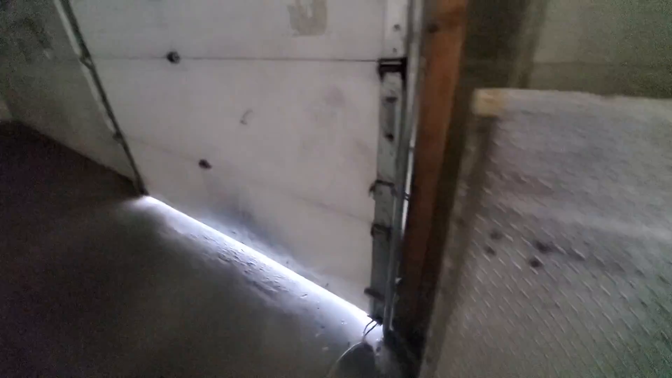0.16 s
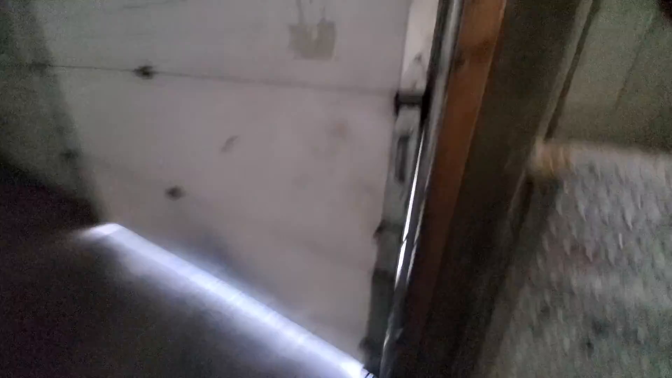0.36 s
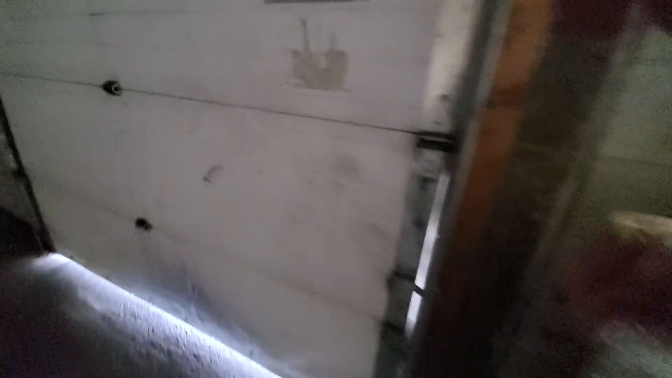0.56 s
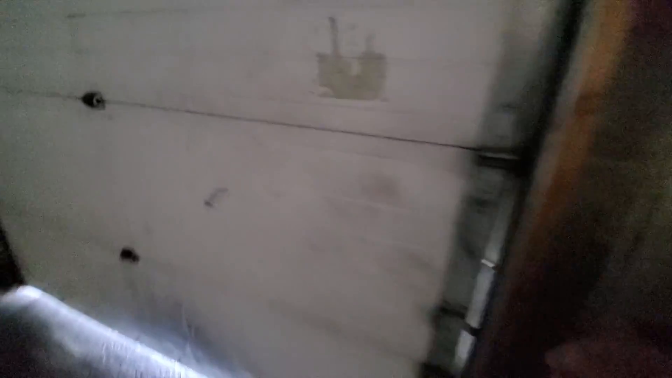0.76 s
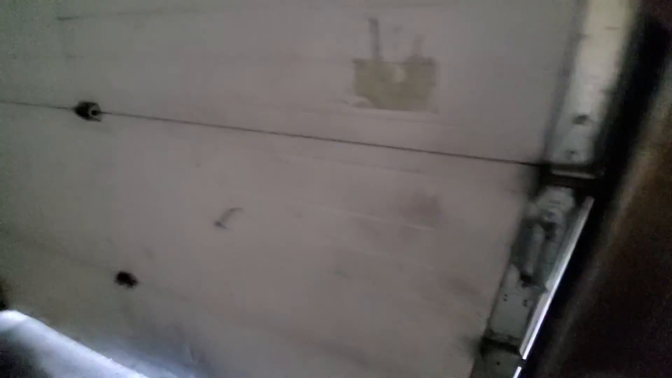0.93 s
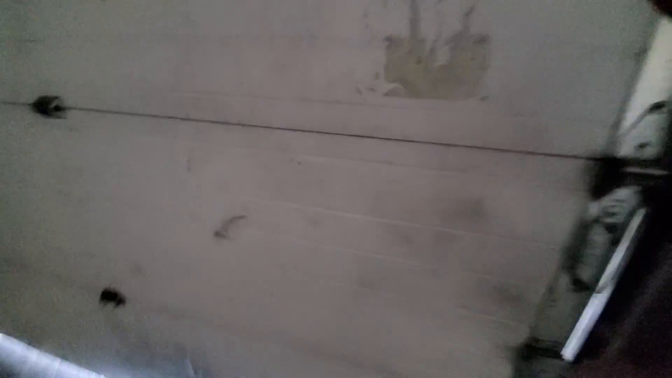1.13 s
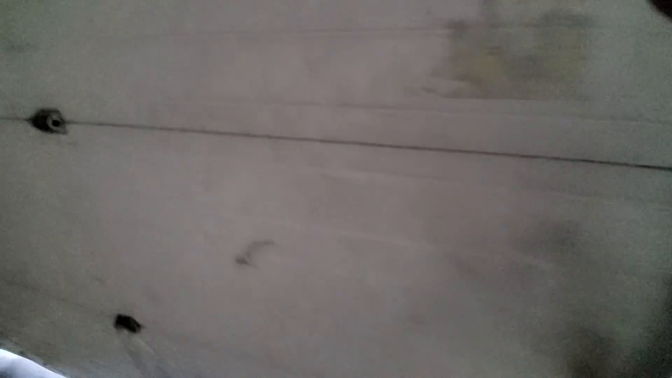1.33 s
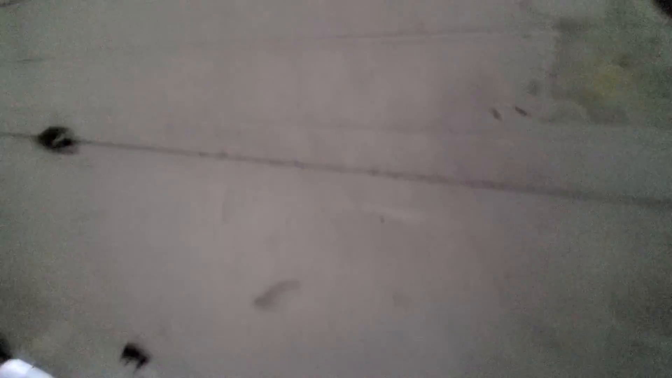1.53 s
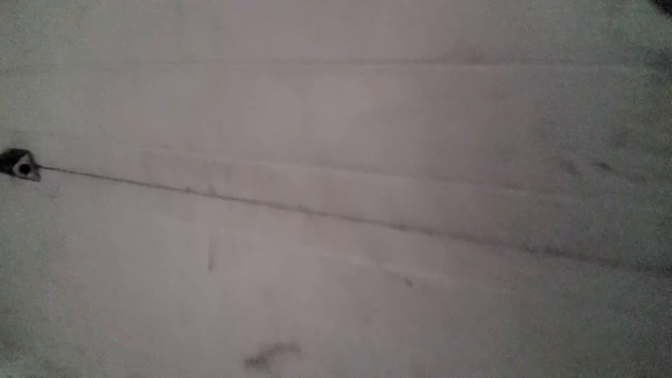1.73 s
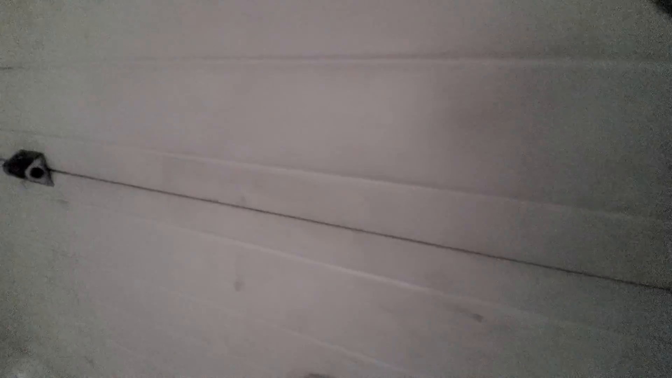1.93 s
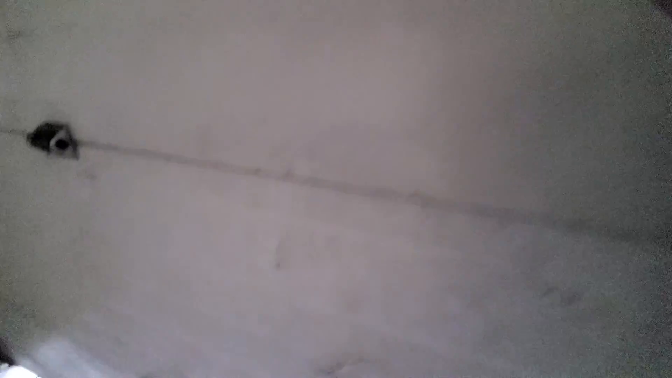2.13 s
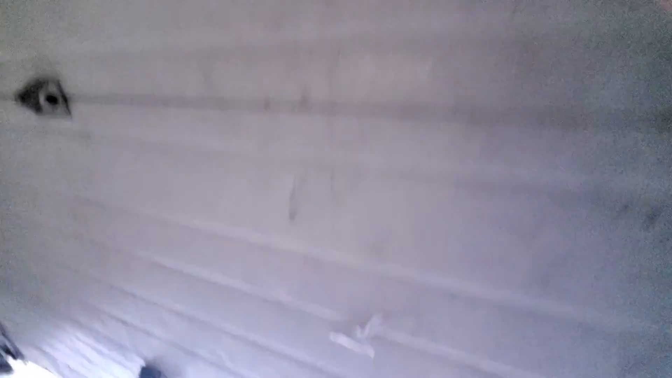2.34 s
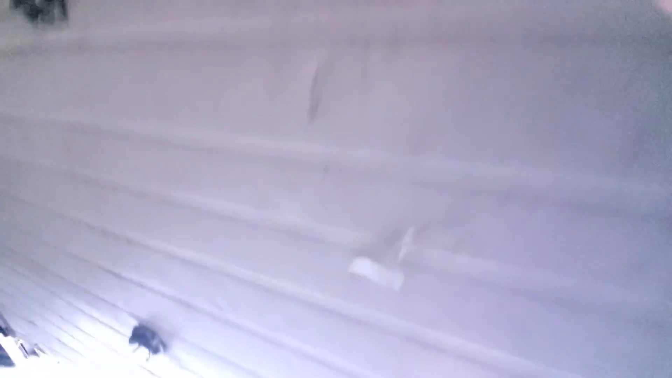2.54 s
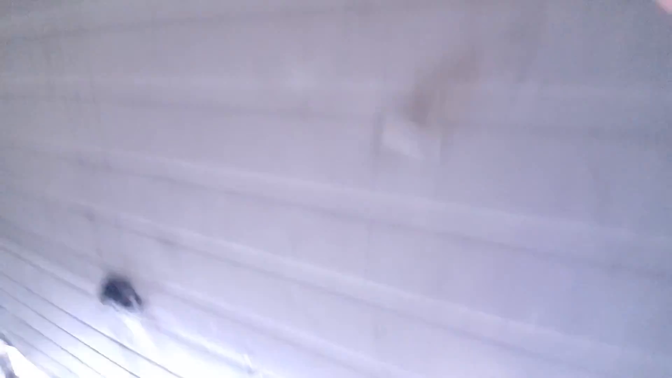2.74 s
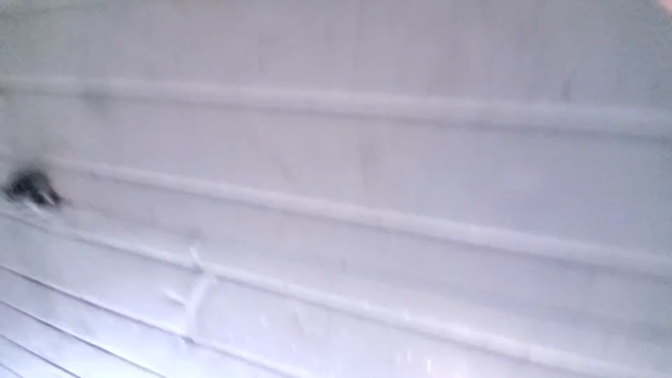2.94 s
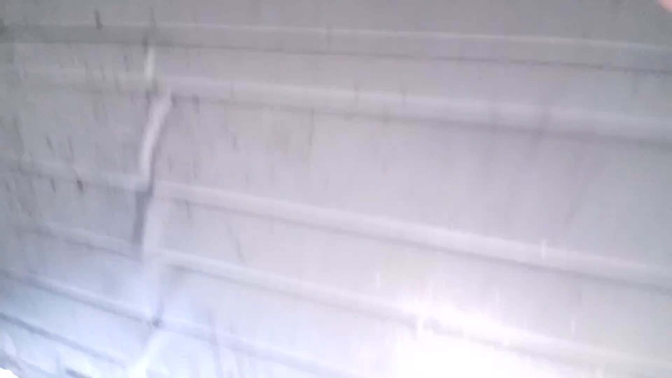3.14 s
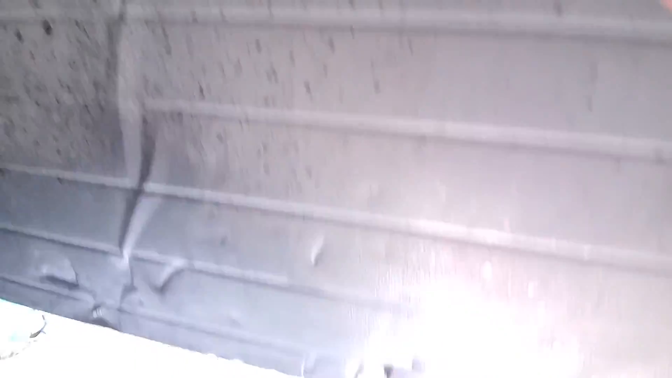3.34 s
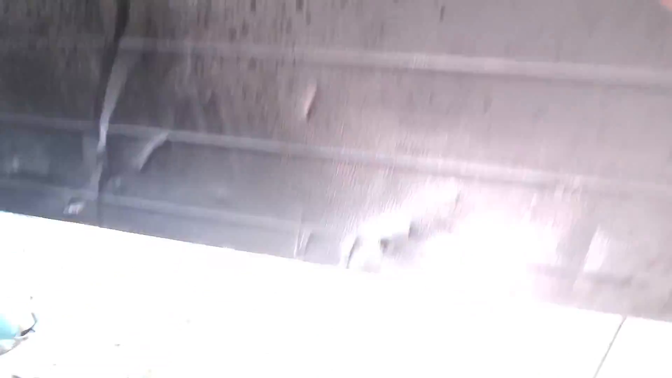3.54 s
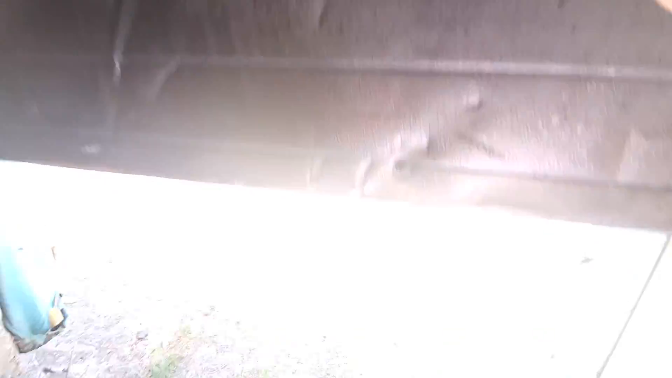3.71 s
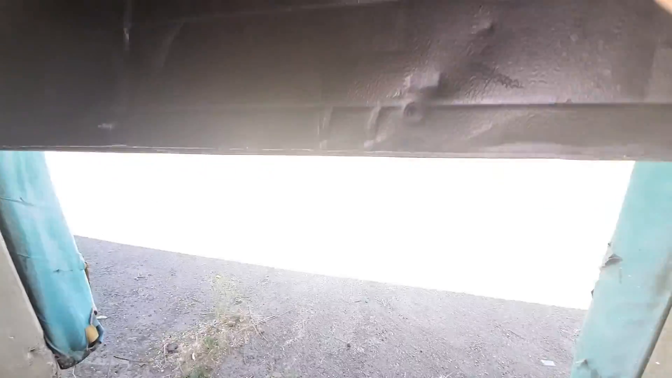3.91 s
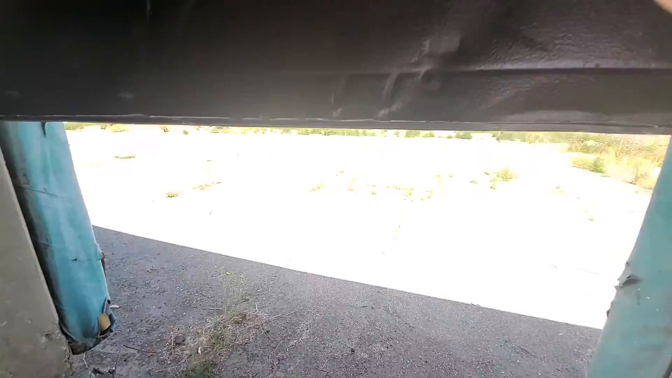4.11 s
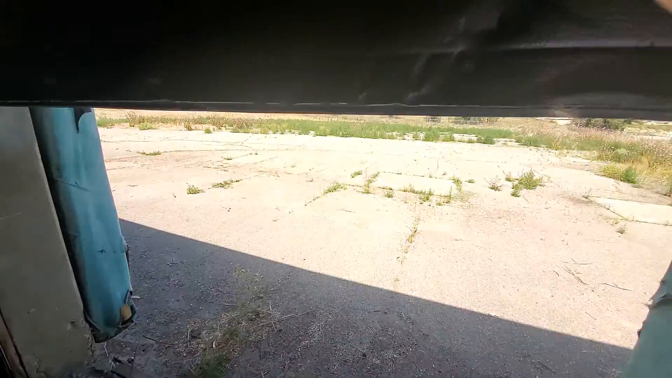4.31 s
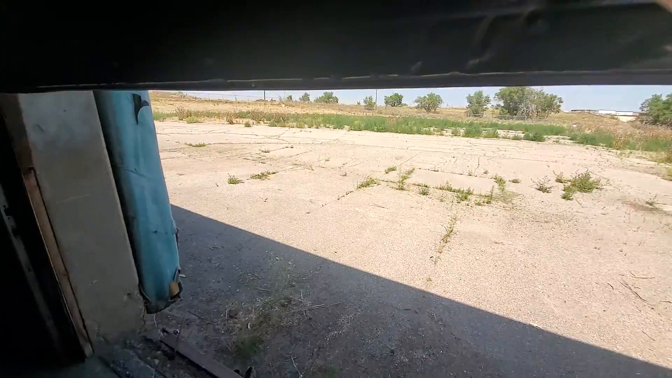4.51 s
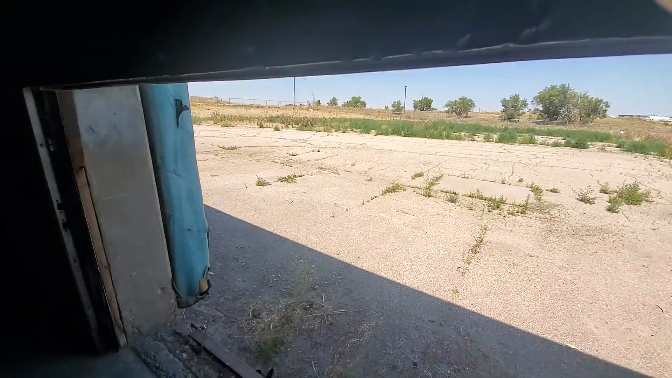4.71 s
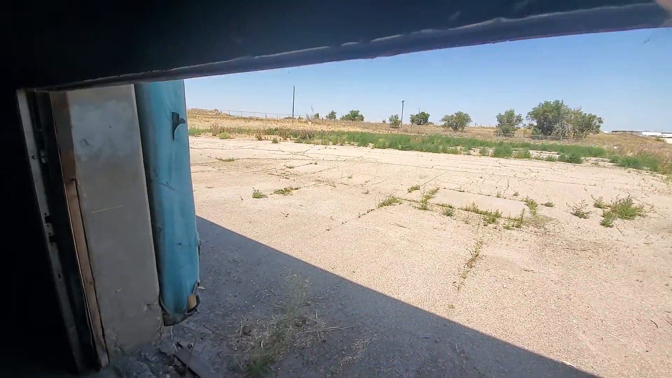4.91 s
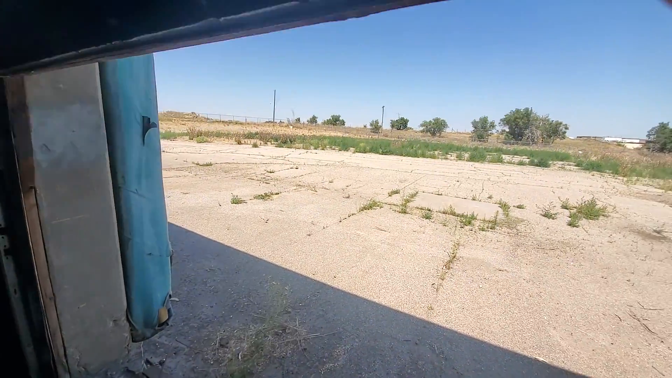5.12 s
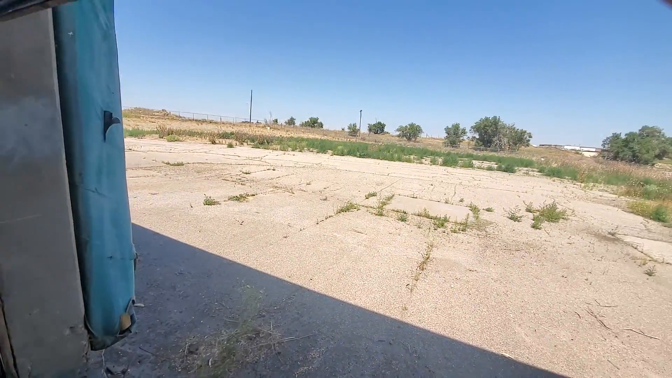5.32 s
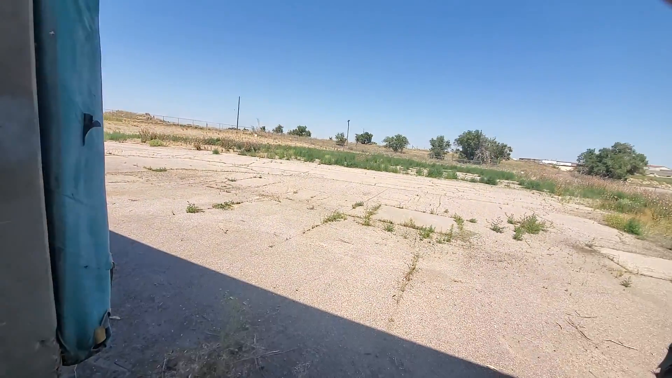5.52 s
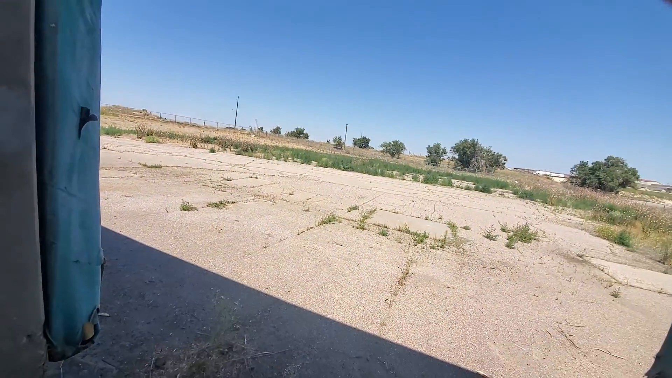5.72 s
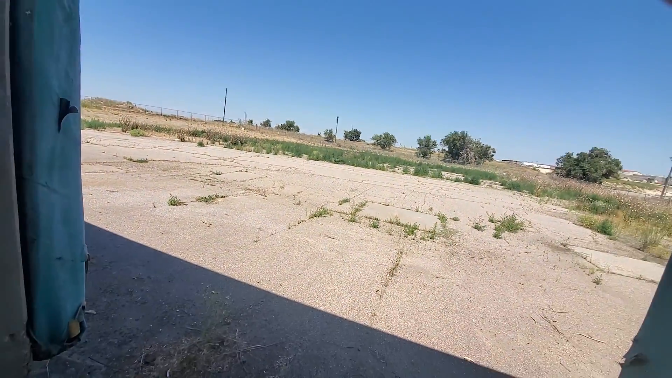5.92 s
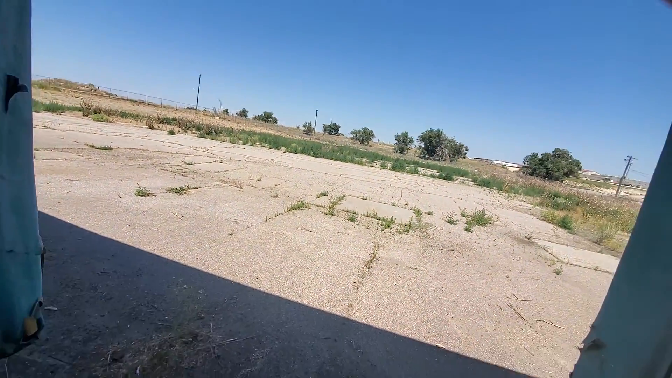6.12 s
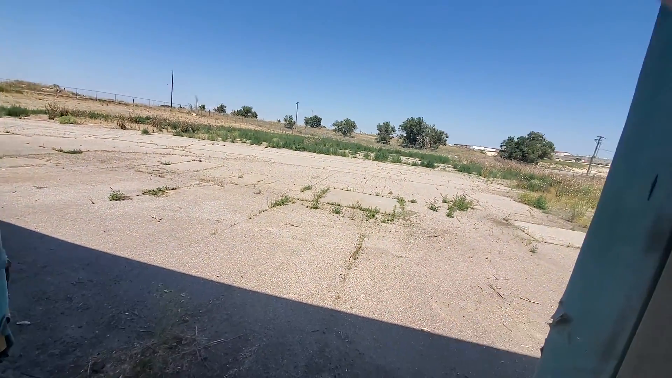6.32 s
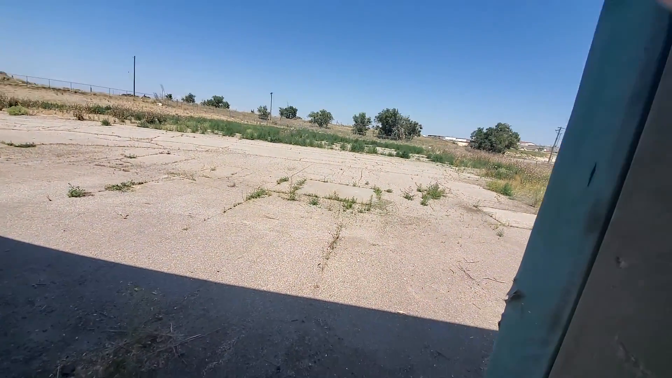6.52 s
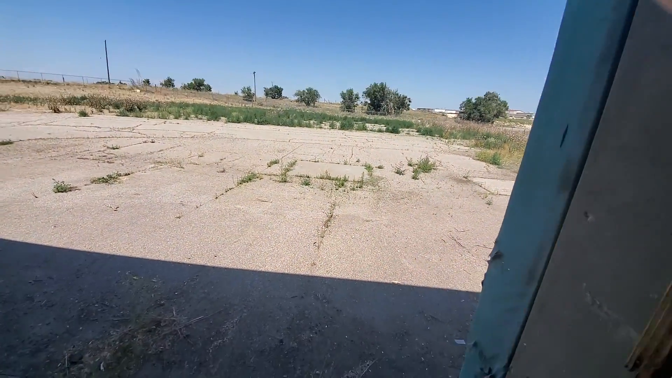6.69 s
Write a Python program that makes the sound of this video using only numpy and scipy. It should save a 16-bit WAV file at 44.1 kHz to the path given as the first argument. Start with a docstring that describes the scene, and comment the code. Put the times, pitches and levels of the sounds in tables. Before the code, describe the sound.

Hand taps and a sharp steel bolt slam precede a big overhead door clattering, squealing and drumming open by hand, ringing through a hollow hall.

```python
"""A sectional steel door is pushed up by hand in two shoves: rollers rattle and grind, panels rumble and drum.
Before that a hand taps and rubs the latch, and the bolt scrapes back and slams against its stop.
Hinges clack, squeal and slap, a dry axle chirps, and a large warehouse rings on over a faint mains hum.
Rolling and scraping are shaped noise and dense random ticks; blows are fading noise and ringing tones."""
import sys
import numpy as np
from scipy import signal
from scipy.fft import rfft, irfft, next_fast_len
from scipy.io import wavfile
from scipy.ndimage import uniform_filter1d, map_coordinates

SR = 44100
rng = np.random.default_rng(int(sys.argv[2]) if len(sys.argv) > 2 else 0)


def materialize(psi):
    """Save the field psi as 16-bit PCM at rate SR to the path in sys.argv[1].

    A 1-D psi becomes a single channel; in a 2-D psi each row is a channel.
    """
    bounded = np.clip(np.atleast_2d(psi).T, -1, 1)
    quanta = np.round(bounded * 32767).astype(np.int16)
    wavfile.write(sys.argv[1], SR, quanta)


N = 297874  # length in samples

# The two shoves that lift the door.
# Each row: start in seconds, speeding-up time in seconds, steady time in seconds, relative level in dB.
SHOVES = [(2.122, 0.77, 0.58, 1), (4.619, 0.57, 0.5, -2)]
START_DB, EASE = -25, 2.43  # a shove begins this far below its top; exponent of the climb
CREEP_DB = -14.5  # between the shoves the door never quite stops; this is the rumble's share
STOP_S = 6.34  # the rollers come to rest: grinding fades and random grit ticks end

# Layers that follow the shoves: base level in dB, and dB lost per second of coasting.
RATTLE_DB, RATTLE_COAST_DB_PER_S = -29, 21
GRIT_DB, GRIT_COAST_DB_PER_S = -42, 28
RUMBLE_DB, RUMBLE_COAST_DB_PER_S = -24, 16.5
DRUM_DB, DRUM_COAST_DB_PER_S = -34, 7
BOOM_DB, BOOM_COAST_DB_PER_S = -33, 14.5
RECEDE_DB_PER_S = 0.83  # the rattle weakens as the rollers move away overhead

# Pitch of the rattling parts along the travel. Each row: time in seconds, centre in Hz.
RATTLE_PITCH = [(2.2, 2080), (2.6, 2400), (3.2, 2222), (3.7, 2052), (5.0, 2048), (5.8, 1760)]
# Resonances of the tracks. Each row: frequency in Hz, width in Hz, lift in dB.
TRACK_RESONANCES = [(2230, 17, -8), (2930, 90, 7.5), (3345, 63, 6), (3650, 40, 8.5), (5730, 35, 12),
                    (7900, 110, -2.5)]
# Colour of the rattle. Each row: frequency in Hz, relative level in dB per Hz.
RATTLE_COLOUR = [(400, -4.5), (900, -4), (1300, -18), (1700, 1.5), (2100, -2), (2800, -6.5), (3300, -9.5),
                 (4500, -18), (5500, -27), (8000, -59)]
# Colour of the grinding grit. Each row: frequency in Hz, relative level in dB per Hz.
GRIT_COLOUR = [(2500, -44.5), (4200, 5), (5200, 1), (6500, 1), (7500, -4), (8300, -13), (9400, -16.5),
               (11300, -7), (13500, -10.5), (16000, -11.5)]
# Sharp grit ticks at set times. Each row: time in seconds, level in dB.
SET_GRIT_TICKS = [(2.35, -41), (4.192, -46), (4.213, -39.5), (4.33, -52), (4.574, -43.5), (4.936, -37.5),
                  (5.294, -34), (5.497, -34), (5.903, -38)]
# Other grit ticks come at random, some louder, and follow the motion:
# ticks per second, base level in dB, most extra in dB, 60 dB fade of every grit tick in seconds.
CRACKS_PER_S, CRACK_DB, CRACK_SPREAD_DB, CRACK_T60 = 5.7, -48, 27.5, 0.042

# Resonances of the rolling panels. Each row: frequency in Hz, width in Hz, lift in dB.
PANEL_RESONANCES = [(70.2, 4.1, 11.5), (297, 17.3, 12), (425, 20, 4), (584, 5.1, 4.5)]
# Colour of the deep boom. Each row: frequency in Hz, relative level in dB per Hz.
BOOM_COLOUR = [(12, -48), (29, 10), (40, 4.5), (75, 9.5), (125, 5), (165, -4.5), (260, -56)]
# Colour of the rumble. Each row: frequency in Hz, relative level in dB per Hz.
RUMBLE_COLOUR = [(70, -45), (120, 2.5), (190, 2), (350, -8), (580, -9), (800, -14.5), (1100, -11),
                 (1600, -12.5), (3000, -80.5)]
# The whole door flexes and booms. Each row: middle in seconds, length in seconds, relative level in dB.
FLEXES = [(2.31, 0.73, -27), (2.73, 0.37, -21.5), (2.94, 0.4, -22), (3.32, 0.166, -23.5), (6.16, 0.2, -32)]
# A panel drums as it bends over the track's curve.
# Each row: middle in seconds, length in seconds, relative level in dB.
BENDS = [(2.95, 0.22, -28), (3.29, 0.33, -29), (3.65, 0.14, -21), (3.88, 0.11, -19), (4.11, 0.43, -25.5),
         (5.31, 0.27, -21.5), (5.63, 0.16, -26.5)]
# The drumming pitch shifts with the bending. Each row: time in seconds, approximate pitch in Hz.
DRUM_PITCH = [(2.96, 173), (3.45, 166), (3.68, 151.7), (5.0, 156), (5.5, 168.6), (6.4, 154.2)]
DRUM_RING_S = 0.0076  # the drumming from a bend swells and dies with this lag
OVERTONE, OVERTONE_DB = 1.91, -21  # a higher panel mode: pitch ratio and relative level in dB
UPRIGHT_DB, UPRIGHT_S = 14.5, 0.9  # extra boom while the door stands upright; how fast it wears off
UNLATCHED_S, STIR_DB = 1.314, -44.5  # the freed door stirs in its tracks from here
LIFT_OFF_S, SEATED_DB = 2.26, -16  # until its bottom edge leaves the floor, the boom is damped

# Light taps of the hand and the loose bolt.
# Each row: time in seconds, relative level in dB, treble setting in dB, approximate ring in Hz.
TAPS = [(0.0315, -35.5, -20, 2600), (0.0945, -36, 1, 635), (0.162, -27, -0.5, 1190),
        (0.1964, -18, -9.5, 1480), (0.2013, -30, -18, 566), (0.2177, -25, -9, 1310), (0.7093, -39, -2, 624),
        (0.7135, -27.5, -11.5, 1270), (0.7847, -29.5, -36, 670), (0.804, -37, -21, 734),
        (0.821, -23.5, -26, 1690), (1.303, -28, -37, 850), (1.3124, -38, 3, 1710), (1.346, -10, -18, 1990),
        (1.353, -15.5, -30, 1840)]
TAP_KNOCK_DB, TAP_KNOCK_DB_PER_OCTAVE = 3, -13  # knock of a tap that rings at 1 kHz; higher ones knock less
TAP_T60 = 0.024  # seconds for a tap that rings at 1 kHz; low ones are damped by the hand
# A hand rubs over the latch. Each row: start in seconds, length in seconds, level in dB.
RUBS = [(0.104, 0.09, -51), (0.47, 0.038, -73), (0.724, 0.0097, -50.5), (0.861, .02, -53.5),
        (1.307, 0.045, -50), (1.38, 0.096, -47.5)]
RUB_RISE_DB_PER_S, RUB_FALL_DB_PER_S = 899, 89

# The bolt scrapes through its guide. Each row: time in seconds, level in dB.
SLIDE = [(1.424, -59), (1.435, -26.5), (1.441, -25), (1.452, -22), (1.468, -23), (1.48, -27.5),
         (1.53, -89.5)]
# The bolt hammers into its stop. Each row: time in seconds, steel level in dB, thud level in dB.
SLAMS = [(1.4709, -12.5, -24), (1.474, -6.5, -28.5), (1.48, -17, -15)]
SLAM_T60, THUD_T60 = 0.039, 0.073  # seconds to fade by 60 dB
# The struck steel sings on faintly. Each row: pitch in Hz, centre level in dB, 60 dB fade in seconds.
SINGING = [(1850, -70.5, 1.2), (2815, -52, 1.6), (6121, -60.5, 1.14)]
# Colour of the bolt's thud. Each row: frequency in Hz, relative level in dB per Hz.
THUD_COLOUR = [(110, -38), (210, 6), (480, -5), (750, -9), (1300, -5.5), (3000, -21)]
# Stereo balance of the bolt. Each row: frequency in Hz, left minus right in dB.
BOLT_BALANCE = [(1200, 5), (3000, 6.5), (12000, -3.5)]

# Steel on steel, at bolt, hinges and track joints. Each row: time in seconds, relative level in dB,
# relative knock in dB, treble setting in dB, 60 dB fade in seconds.
CLACKS = [(1.4369, -4, -16, -5, 0.079), (1.8506, -11.5, -10, -18, 0.06), (1.8598, -13.5, -10, -7.5, 0.041),
          (1.873, -21, -17, -19, 0.075), (2.6799, -11.5, -45, -22.5, 0.5), (2.952, -11, -3, -29, 0.49),
          (3.0347, -8, -6, -52, 0.28), (3.271, -0.5, -17, -15, 0.1), (3.29, -2.5, -15, -20, 0.11),
          (3.3131, -4, -11, -15, 0.13), (3.3956, -14.5, 2, -3, 0.11), (3.411, -15, -19, -0.5, 0.034),
          (3.4391, -20.5, 10, -41, 0.32), (3.5917, -17, 10.5, -20, 0.19), (3.6306, -30, 18.5, -30, 0.19),
          (4.5886, -28.5, 7.5, -11, 0.14), (5.046, -10.5, -5, -24.5, 0.11),
          (5.1231, -11.5, -11, -24, 0.056), (5.4891, -15, -4, -19, 0.28), (5.719, -13.5, -1, -47, 0.051),
          (5.903, -17, -7, -19, 0.19), (6.127, -5, -20, -24.5, 0.028), (6.134, -14.5, -18, -22.5, 0.21),
          (6.4448, -35, -4, -11.5, 0.11)]
# Modes of the bolt and brackets. Each row: frequency in Hz, relative strength in dB.
STEEL_MODES = [(1760, -2.5), (2800, -6.5), (5640, -0.5), (6120, 4.5), (6850, -6), (7560, -14.5),
               (11700, -2.5), (12800, -7)]
# Colour of clanging steel. Each row: frequency in Hz, relative level in dB per Hz.
CLANG_COLOUR = [(600, -60.5), (1300, 3.5), (1900, 5), (2800, 3), (3600, 3), (5000, 2), (6300, 1.5),
                (7500, 4.5), (8400, -8.5), (9400, -6.5), (11500, -2.5), (16000, -7.5)]
# Colour of a dull knock. Each row: frequency in Hz, relative level in dB per Hz.
KNOCK_COLOUR = [(90, -54), (250, -7.5), (450, 0.5), (650, 2.5), (1200, -3.5), (2200, -10), (5000, -68)]
BLOW_T60 = 0.007  # seconds; the first sharp snap of a contact
# A loose roller drops against the side of its track. Each row: time in seconds, level in dB.
CLINKS = [(2.249, -32.5), (4.209, -26.5), (4.59, -29.5), (4.7719, -37.5), (4.8905, -31), (4.9897, -30),
          (5.082, -29.5), (5.2117, -52)]
# Modes of that roller. Each row: approximate frequency in Hz, relative strength in dB.
ROLLER_MODES = [(1990, -6.5), (2270, -10), (2610, -9)]
ROLLER_T60 = 0.19  # seconds
# A roller stem binds in its hinge and squeals.
# Each row: middle in seconds, length in seconds, pitch in Hz, centre level in dB.
SQUEALS = [(2.979, 0.0391, 2260, -23.5), (3.046, 0.069, 1790, -22.5), (3.125, 0.045, 2255, -26),
           (3.166, 0.028, 2260, -22)]
# Loose panels slap dully against each other. Each row: time in seconds, relative level in dB.
SLAPS = [(2.2834, -37), (2.5149, -31), (2.6407, -32), (2.7646, -14), (2.9769, -15), (3.479, -24),
         (3.8678, -26), (4.0558, -26), (5.185, -20), (5.3213, -26), (5.4273, -21), (5.5688, -17),
         (5.7778, -20), (5.8374, -21.5), (5.9417, -22), (5.9786, -23)]
# Blows that shake the whole door. Each row: time in seconds, relative level in dB.
THUMPS = [(1.351, -32.5), (1.479, -16), (1.506, -17), (1.861, -29.5), (1.891, -27), (2.248, -27)]
# Panel modes set swinging by a blow.
# Each row: approximate frequency in Hz, relative level in dB, 60 dB fade in seconds.
SHEET_MODES = [(69.3, 3.5, 0.13), (90, -9.5, 0.59), (126, -9, 0.54), (169, -10, 0.24), (256, 11.5, 0.027),
               (308, -25.5, 0.49), (527, -9, 0.14), (615, -6, 0.081), (774, -21.5, 0.072)]
# Dry axle chirps. Each row: middle in seconds, length in seconds, centre pitch in Hz, relative level in dB.
SQUEAKS = [(2.574, 0.043, 11700, -40.5), (2.61, 0.074, 9460, -42), (2.859, 0.051, 10100, -44),
           (2.886, 0.02, 11900, -32.5), (2.896, 0.038, 9800, -36.5), (3.007, 0.028, 10740, -35.5)]

# How long the hall rings. Each row: frequency in Hz, 60 dB fade in seconds.
HALL_FADE = [(100, 9.8), (500, 3.2), (2500, 6.6), (5500, 2.6), (8000, 1.6), (15000, 0.43)]
# Colour of the still air. Each row: frequency in Hz, relative level in dB per Hz.
AIR_COLOUR = [(20, -26.5), (44, -12), (100, -17.5), (180, -26), (500, -30.5), (1650, -36), (3000, -44),
              (6200, -45.5), (8600, -62), (16000, -57.5)]
HUM_HZ, HUM_DB = 119, -58  # mains hum: centre pitch and centre level

# How alike the two channels are. Each row: frequency in Hz, likeness with 1 for identical.
LIKENESS = [(100, 0.97), (290, 0.88), (480, 0.77), (800, 0.87), (1350, 0.33), (2250, 0.28), (3200, 0.17),
            (4500, 0.15), (15000, 0.05)]
# Stereo balance of everything. Each row: frequency in Hz, left minus right in dB.
STEREO_BALANCE = [(60, -4.5), (130, 0.5), (450, -4), (1000, 0), (2000, 1), (4000, -2.5), (12000, 0.5)]
LAG_S = 0.00043  # the near track is on the right, so the left microphone hears it later
LAG_FROM_HZ = 486  # lower sound comes from the whole width of the door
TOP_HZ = 15950  # the sound ends steeply above this


def amp(db):
    """Turn decibels into gain."""
    return 10 ** (np.asarray(db) / 20)


def unit(x):
    """Scale so that the average of the channels has an rms level of 1."""
    middle = np.atleast_2d(x).mean(0)
    return x / np.sqrt(np.mean(middle ** 2) + 1e-20)


def along(points, hz):
    """Read a curve of (Hz, value) points, spaced by the logarithm of frequency."""
    f, v = np.transpose(points)
    return np.interp(np.log(hz + 1), np.log(f + 1), v)


def wobble(rate):
    """A smooth random curve with rate knots a second."""
    knots = rng.standard_normal(int(N * rate / SR) + 4)
    return map_coordinates(knots, [np.arange(N) * rate / SR])


def filtered(x, response):
    """Multiply the spectrum of x by a response of frequency."""
    n = x.shape[-1]
    m = next_fast_len(n + 4096)  # spare room so that the tail does not wrap round
    return irfft(rfft(x, m) * response(np.fft.rfftfreq(m, 1 / SR)), m)[..., :n]


def add(track, s, sound):
    """Mix a sound into a track at s seconds."""
    part = track[..., max(round(s * SR), 0):][..., :sound.shape[-1]]
    part += sound[..., :part.shape[-1]]


def fade(t, t60):
    """Free decay by 60 dB in t60 seconds."""
    return np.exp(-np.log(1000) * t / np.maximum(t60, 0.003))


def noise(colour, size, peaks=()):
    """Noise with resonances; above the bass it reaches the right microphone first."""
    def response(hz):
        turn = np.arccos(np.clip(along(LIKENESS, hz), -1, 1)) / 2
        lift = sum(db / (1 + (2 * (hz - centre) / width) ** 2) for centre, width, db in peaks)
        return amp(along(colour, hz) + lift) * np.array([np.cos(turn), np.sin(turn)])

    def delay(hz):
        lag = LAG_S * hz ** 2 / (hz ** 2 + LAG_FROM_HZ ** 2)
        return np.exp(-2j * np.pi * hz * lag)

    mid, side = filtered(rng.standard_normal((2, size)), response)
    left = filtered(mid + side, delay)
    return unit(np.array([left, mid - side]))


def chatter(colour, peaks, rate, spread_db, t60, top_hz, count=6):
    """Several parts tick at random moments, each with its own ring; the overall level is kept steady."""
    t = np.arange(SR // 6) / SR
    out = np.zeros((2, N))
    for _ in range(count):
        hits = rng.random(N) < rate / count / SR
        sizes = amp(spread_db * np.clip(rng.standard_normal(N), -2, 2))
        ticks = hits * sizes * rng.choice([-1, 1], N)
        ring = noise(colour, len(t), peaks) * fade(t, t60)
        out += signal.oaconvolve(ticks[None], ring, axes=1)[:, :N]
    out = filtered(out, lambda hz: 1 / (1 + (hz / top_hz) ** 8))
    slow_level = np.sqrt(np.abs(uniform_filter1d(np.mean(out ** 2, 0), size=SR // 6)) + 1e-12)
    return unit(out / slow_level)


def motion(coast_db_per_s, lead):
    """Gain that follows the shoves: speeding up, steady, coasting, creeping; lead under 1 builds up more slowly."""
    t = np.arange(N) / SR
    first_top, last_top = (s + rise for s, rise, steady, db in SHOVES)
    # what dies fast while coasting is also weak at a creep
    creep_db = CREEP_DB * coast_db_per_s / RUMBLE_COAST_DB_PER_S
    stages = [np.where((t > first_top) & (t < last_top), creep_db, -np.inf)]
    for s, rise, steady, db in SHOVES:
        to_go = np.maximum(1 - lead * (t - s) / rise, 0)
        coasting = np.maximum(t - s - rise - steady, 0)
        stages.append(db + START_DB * to_go ** EASE - coast_db_per_s * coasting)
    return amp(np.max(stages, axis=0))


def swells(rows):
    """Gain of smooth swells, each with its middle, length and level."""
    t = np.arange(N) / SR
    return sum(amp(db) * np.cos(np.pi * np.clip((t - s) / length, -0.5, 0.5)) for s, length, db in rows)


def rattle_hz(s):
    """Where the loose hardware rings at this point of the travel."""
    return np.interp(s, *np.transpose(RATTLE_PITCH))


def rollers():
    """Loose rollers rattle in clusters and grind over grit, in a wash of their own echoes."""
    t = np.arange(N) / SR
    stopped = np.maximum(t - STOP_S, 0)
    travel = np.maximum(t - SHOVES[0][0], 0)
    rattle_level = amp(RATTLE_DB + RECEDE_DB_PER_S * (2.0 - travel))
    rattle_level = rattle_level * motion(RATTLE_COAST_DB_PER_S, lead=0.59)
    grit_level = amp(GRIT_DB) * motion(GRIT_COAST_DB_PER_S, lead=0.64) * fade(stopped, t60=1.0)
    # in both layers the steady noise is the wash of echoes
    clatter = chatter(RATTLE_COLOUR, TRACK_RESONANCES, rate=300, spread_db=4.5, t60=0.06, top_hz=5700)
    clatter += noise(RATTLE_COLOUR, N, TRACK_RESONANCES)
    clusters = amp(2.2 * wobble(36))
    clatter += amp(1) * unit(clusters * pings(rate=420, spread_db=7))
    grinding = chatter(GRIT_COLOUR, TRACK_RESONANCES, rate=120, spread_db=-1.0, t60=0.039, top_hz=17100)
    grinding += amp(0.5) * noise(GRIT_COLOUR, N, TRACK_RESONANCES)
    # uneven track jolts the rattle and the grinding together
    jolts = amp(1.5 * wobble(24))
    return rattle_level * unit(jolts * clatter) + grit_level * unit(jolts * grinding)


def pings(rate, spread_db):
    """Loose hinges and roller stems ping briefly, each at a pitch of its own; a few stand out."""
    t, out = np.arange(SR // 8) / SR, np.zeros((2, N))
    life = fade(t, 0.07) * (1 - np.exp(-t / 0.0003))
    draws = rng.random((int(rate * N / SR), 5)) * [N / SR, 1, 1, 1, 1]
    for s, pitch, size, phase, lag in draws:
        hz = rattle_hz(s) * 2 ** (0.7 * (pitch - 0.5))
        tone = np.sin(2 * np.pi * (hz * t + phase + np.array([[0], [lag]])))
        add(out, s, amp(spread_db * size ** 2) * life * tone)
    return unit(out)


def panels():
    """The rolling door shakes its thin panels: a boom, one drumming resonance and a broad rumble."""
    t = np.arange(N) / SR
    free = np.clip((t - UNLATCHED_S) * 20, 0, 1)
    upright = amp(UPRIGHT_DB * np.exp(-np.maximum(t - SHOVES[0][0], 0) / UPRIGHT_S))
    rolling_boom = amp(BOOM_DB) * upright * motion(BOOM_COAST_DB_PER_S, lead=0.53)
    boom_level = free * np.hypot(rolling_boom, swells(FLEXES))
    boom_level = boom_level * amp(SEATED_DB * np.clip((LIFT_OFF_S - t) * 10, 0, 1))
    rolling_rumble = amp(RUMBLE_DB) * motion(RUMBLE_COAST_DB_PER_S, lead=0.7)
    rumble_level = free * np.hypot(rolling_rumble, amp(STIR_DB))
    shake = chatter(RUMBLE_COLOUR, PANEL_RESONANCES, rate=240, spread_db=3, t60=0.085, top_hz=2240)
    shake += amp(-3) * noise(RUMBLE_COLOUR, N, PANEL_RESONANCES)
    boom = boom_level * noise(BOOM_COLOUR, N, PANEL_RESONANCES)
    return boom + free * drumming() + rumble_level * unit(shake)


def drumming():
    """A bent panel drums on its main mode and a weak higher one; both waver and ring on after the bend."""
    t = np.arange(N) / SR
    keep = np.exp(-1 / (DRUM_RING_S * SR))
    bending = signal.lfilter([1 - keep], [1, -keep], swells(BENDS))
    pitch = np.interp(t, *np.transpose(DRUM_PITCH))

    def mode(ratio):
        phase = np.cumsum(ratio * pitch + 7 * wobble(50)) / SR
        return unit(amp(3 * wobble(30)) * np.sin(2 * np.pi * phase))

    level = np.hypot(amp(DRUM_DB) * motion(DRUM_COAST_DB_PER_S, lead=0.9), bending)
    return level * (mode(0.99) + amp(OVERTONE_DB) * mode(OVERTONE))


def cracks():
    """Grit ticks sharply under the rollers, at set times and at random; the random ticks follow the motion."""
    t, out = np.arange(SR // 16) / SR, np.zeros((2, N))
    start = SHOVES[0][0]
    gain = motion(GRIT_COAST_DB_PER_S, lead=1.0) ** 0.51
    colour = [(2000, -6), (4500, 2.5), (7500, -7.0), (9000, -21), (11500, -8.5), (16000, -7)]
    ticks = [(s, amp(db)) for s, db in SET_GRIT_TICKS]
    for u, extra in rng.random((int(CRACKS_PER_S * (STOP_S - start)), 2)):
        s = start + u * (STOP_S - start)
        ticks.append((s, gain[int(s * SR)] * amp(CRACK_DB + CRACK_SPREAD_DB * extra ** 2)))
    for s, level in ticks:
        add(out, s, level * noise(colour, len(t)) * fade(t, CRACK_T60))
    return out


def bolt():
    """The bolt judders through its guide with a shrill ring, hammers into its stop and leaves the steel singing."""
    t = np.arange(N) / SR
    times, slide_db = np.transpose(SLIDE)
    fade_in_db = -300 * np.maximum(times[0] - t, 0)
    scrape_level = amp(np.interp(t, times, slide_db) + fade_in_db)
    shrill = [(2740, 600, 13), (5760, 900, 6), (12700, 600, 9)]
    out = scrape_level * chatter(CLANG_COLOUR, shrill, rate=3500, spread_db=6, t60=0.025, top_hz=17000, count=2)
    hit_t = np.arange(SR // 4) / SR
    modes = [(hz, 330, 14.5 + db / 2) for hz, db in STEEL_MODES]
    for s, steel_db, thud_db in SLAMS:
        steel = noise(CLANG_COLOUR, len(hit_t), modes) * fade(hit_t, SLAM_T60)
        thud = noise(THUD_COLOUR, len(hit_t)) * fade(hit_t, THUD_T60)
        add(out, s, (amp(steel_db) * steel + amp(thud_db) * thud) * (1 - np.exp(-hit_t / 0.00034)))
    for hz, db, t60 in SINGING:
        drift = np.array([wobble(20), wobble(20)])
        tone = np.sin(2 * np.pi * hz * t + drift)
        add(out, SLAMS[0][0], amp(db + 2 * wobble(14)) * fade(t, t60) * tone)
    return filtered(out, lambda hz: amp(along(BOLT_BALANCE, hz) * np.array([[0.5], [-0.5]])))


def strike(db, knock_db, treble_db, ring_hz, t60, ring_db, rebound_db, snap_db):
    """One contact and its quick rebounds: dense steel modes, a dull knock and the struck part's own ring."""
    t = np.arange(SR // 4) / SR
    rebounds = sum((t > s) * fade(np.abs(t - s), 0.012) for s in rng.uniform(0.001, 0.025, 3))
    life = fade(t, t60) + amp(snap_db) * fade(t, BLOW_T60) + amp(rebound_db) * rebounds
    modes = [(hz, 120, 8.5 + level / 2) for hz, level in STEEL_MODES]
    steel = noise(CLANG_COLOUR, len(t), modes) * life
    # the first point is a nearly flat 0 dB anchor
    treble = [(3000, 0.0047), (4700, treble_db / 2 + 6.5), (7000, treble_db + 7.0), (11000, treble_db + 5.0)]
    steel = filtered(steel * (1 - np.exp(-t / 0.0011)), lambda hz: amp(along(treble, hz)))
    knock = amp(knock_db) * noise(KNOCK_COLOUR, len(t)) * fade(t, t60)
    ring = np.zeros((2, len(t)))
    for _ in range(3):
        hz = ring_hz * rng.normal(1, 0.0442)
        phase = rng.random() + 0.51 * rng.normal(size=(2, 1))
        ring += fade(t, t60) * np.sin(2 * np.pi * (hz * t + phase))
    # low rings belong to the knock
    ring = ring * amp(ring_db + np.interp(ring_hz, [800, 1400], [knock_db - 1.0, 0]))
    return amp(db) * (steel + (knock + ring) * (1 - np.exp(-t / 0.0001)))


def clacks():
    """Bolt, hinges and rollers strike steel and ring near the pitch of the rattle."""
    out = np.zeros((2, N))
    for s, db, knock_db, treble_db, t60 in CLACKS:
        hit = strike(db, knock_db, treble_db, rattle_hz(s), t60, ring_db=-7, rebound_db=-14, snap_db=2)
        add(out, s, hit)
    return amp(-13.5) * out


def slaps():
    """Each slap is a hollow knock of the sheet with a short jingle of its hinge."""
    out = np.zeros((2, N))
    for s, db in SLAPS:
        hit = strike(db - 8.5, knock_db=1, treble_db=-25, ring_hz=rattle_hz(s), t60=0.07,
                     ring_db=-1, rebound_db=-20, snap_db=-12)
        add(out, s, hit)
    return out


def thumps():
    """Hard blows set the panels' low modes swinging."""
    t, out = np.arange(SR // 2) / SR, np.zeros(N)
    for s, db in THUMPS:
        swing = np.zeros(len(t))
        for hz, level, t60 in SHEET_MODES:
            tone = np.sin(2 * np.pi * hz * rng.normal(1, 0.086) * t)
            swing += amp(level) * fade(t, t60) * tone * rng.choice([-1, 1])
        add(out, s, amp(db - 5.0) * swing * (1 - np.exp(-t / 0.0034)))
    return filtered(out, lambda hz: hz ** 4 / (hz ** 4 + 50 ** 4))


def clinks():
    """A dropped roller clinks in the track, ringing roughly around its few modes."""
    t, out = np.arange(SR // 4) / SR, np.zeros((2, N))
    for s, db in CLINKS:
        modes = [(hz * rng.normal(1, 0.02), 150, 15 + level) for hz, level in ROLLER_MODES]
        ring = noise(RATTLE_COLOUR, len(t), modes)
        add(out, s, amp(db) * ring * fade(t, ROLLER_T60) * (1 - np.exp(-t / 0.002)))
    return out


def stems():
    """A binding stem sticks and slips on one ring of its hinge, here a short tone of unsteady pitch and level."""
    out = np.zeros((2, N))
    for s, length, hz, db in SQUEALS:
        n = int(length * SR)
        roughness = np.array([wobble(160)[:n], wobble(160)[:n]])
        phase = hz * np.arange(n) / SR + 0.06 * roughness
        level = amp(db + 2 * wobble(120)[:n]) * np.hanning(n) ** 0.5
        add(out, s - length / 2, level * np.sin(2 * np.pi * phase))
    return out


def squeaks():
    """Short, rough, very high chirps of a dry axle, wavering in pitch."""
    out = np.zeros((2, N))
    for s, length, hz, db in SQUEAKS:
        n = int(length * SR)
        pitch = hz * (1 + 0.05 * wobble(70)[:n] + 0.03 * wobble(900)[:n])
        tone = np.sin(2 * np.pi * np.cumsum(pitch) / SR)
        hiss = noise([(hz * 0.35, -40), (hz, 0), (hz * 2.5, -40)], n, [(hz, 250, 10)])
        add(out, s - length / 2, amp(db - 5.5) * np.hanning(n) * (hiss + tone))
    return out


def taps():
    """Fingers and the loose bolt tap the door: the lower the ring, the shorter it is and the more it knocks."""
    out = np.zeros((2, N))
    for s, db, treble_db, hz in TAPS:
        khz = hz / 1000
        knock_db = TAP_KNOCK_DB + TAP_KNOCK_DB_PER_OCTAVE * np.log2(khz)
        t60 = TAP_T60 * np.sqrt(khz)
        add(out, s, strike(db, knock_db, treble_db, hz, t60, ring_db=-4, rebound_db=-24, snap_db=0))
    return amp(-14) * out


def rubbing():
    """Skin and the loose handle rustle against the sheet steel, as dense tiny ticks."""
    t = np.arange(N) / SR
    strokes = np.zeros(N)
    for s, length, db in RUBS:
        rise_db = RUB_RISE_DB_PER_S * np.maximum(s - t, 0)
        fall_db = RUB_FALL_DB_PER_S * np.maximum(t - s - length, 0)
        strokes += amp(db - rise_db - fall_db)
    rustle = [(200, -15.5), (450, 6.0), (900, -1), (1600, 5.5), (2400, -5.5), (4000, -9),
              (6500, -7.0), (9000, -24.0), (12000, -15.0), (16000, -20.0)]
    peaks = [(1620, 200, 6), (3300, 300, 6)]
    return strokes * chatter(rustle, peaks, rate=700, spread_db=4, t60=0.015, top_hz=17000, count=2)


def hall(x):
    """Countless echoes: the energy of each band comes back as diffuse noise, and the treble dies first."""
    hz, t, z = signal.stft(x, SR, nperseg=512)
    linger = (fade(t, along(HALL_FADE, hz)[:, None]) * (1 - np.exp(-t / 0.0073))) ** 2
    power = np.mean(np.abs(z) ** 2, 0)
    energy = signal.fftconvolve(power, linger / linger.sum(1).max(), axes=1)[:, :len(t)]
    colour = [(300, -5.5), (550, 9.5), (1600, 2.5), (3000, -5.5), (4200, 1.0), (6000, -4.0),
              (9000, -3.0), (15000, 0.5)]
    wash = signal.stft(noise(colour, N, [(2760, 150, 2.7)]), SR, nperseg=512)[2]
    echoes = wash * np.sqrt(np.abs(energy) / np.mean(np.abs(wash) ** 2))
    return signal.istft(echoes, SR, nperseg=512)[1][:, :N]


def room_tone():
    """Still air as soft noise, and a faint, wavering mains hum."""
    t = np.arange(N) / SR
    hum_level = amp(HUM_DB + 2 * wobble(6) + 3 * wobble(28)) * np.sqrt(2)
    hum = hum_level * np.sin(2 * np.pi * HUM_HZ * t + 0.6 * wobble(22))
    return hum + amp(-53) * noise(AIR_COLOUR, N)


def scene():
    """Door, latch and hall together; the blows, rubbing and squeals feed the hall."""
    blows = taps() + rubbing() + bolt() + clacks() + clinks() + stems() + slaps() + thumps()
    moving = rollers() + panels() + cracks() + squeaks()
    return moving + blows + amp(-14.0) * hall(blows) + room_tone()


def record(dry):
    """Stereo balance varies with pitch; the deepest bass is cut, peaks round off and the band ends steeply."""
    def balance(hz):
        bass_cut = hz ** 2 / (hz ** 2 + 16 ** 2)
        return amp(along(STEREO_BALANCE, hz) * np.array([[0.5], [-0.5]])) * bass_cut

    pair = filtered(dry, balance)
    pair = pair / (1 + np.abs(pair / 0.86) ** 6) ** (1 / 6)
    return filtered(pair, lambda hz: 1 / (1 + (hz / TOP_HZ) ** 160))


dry = scene()
out = record(dry)
materialize(out)
```